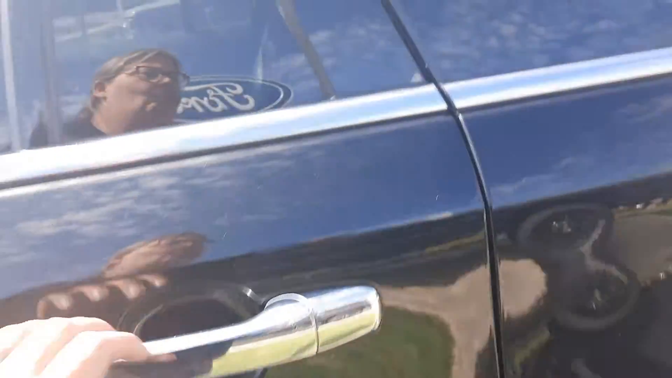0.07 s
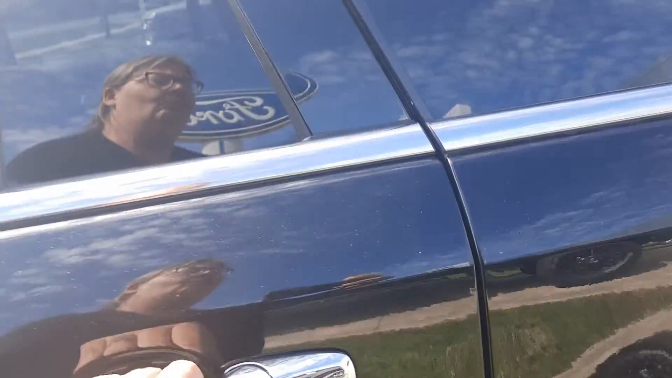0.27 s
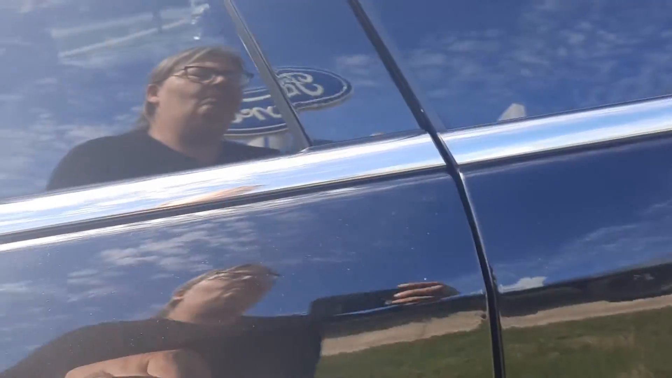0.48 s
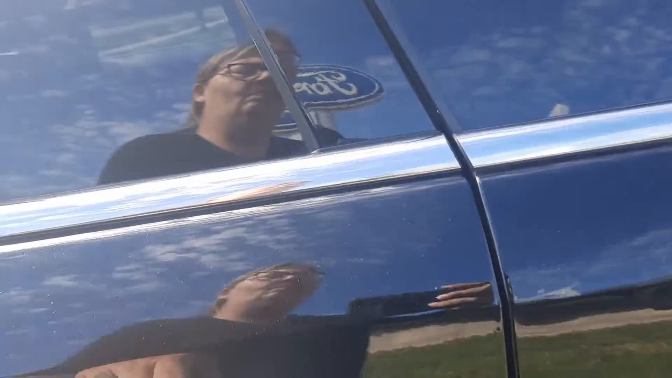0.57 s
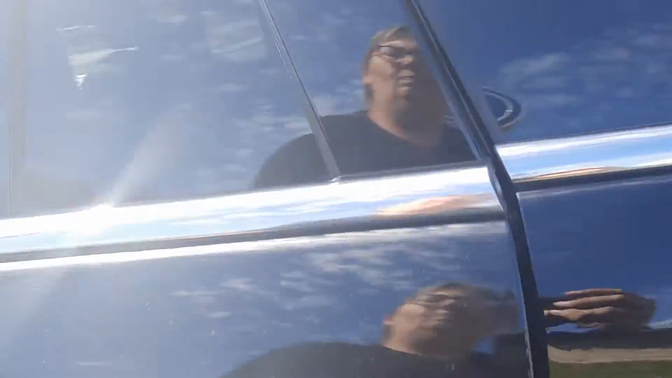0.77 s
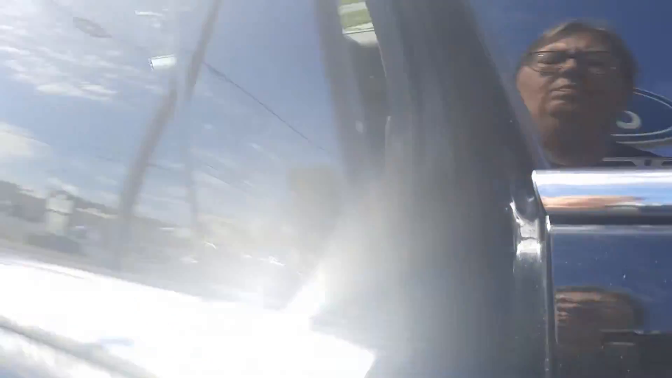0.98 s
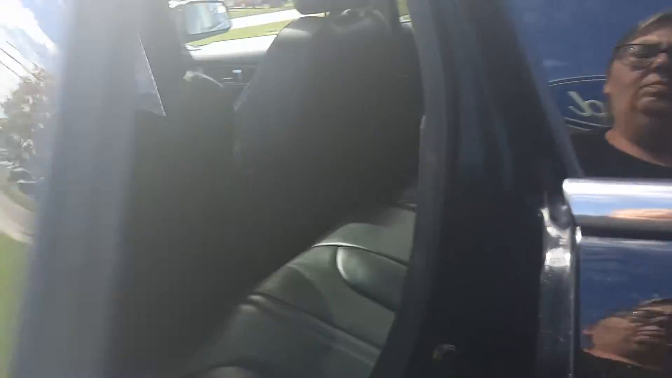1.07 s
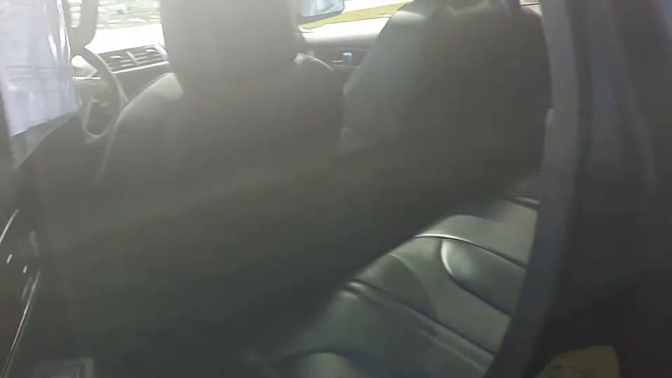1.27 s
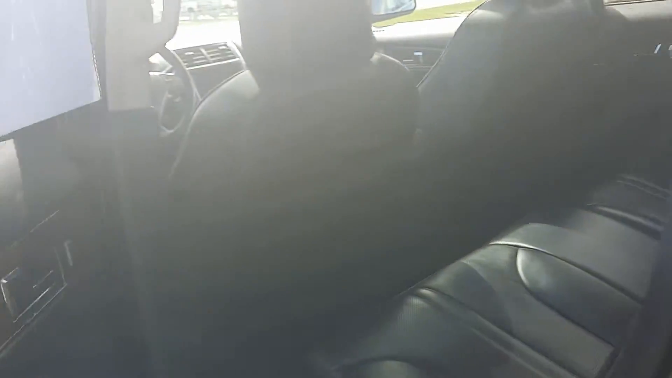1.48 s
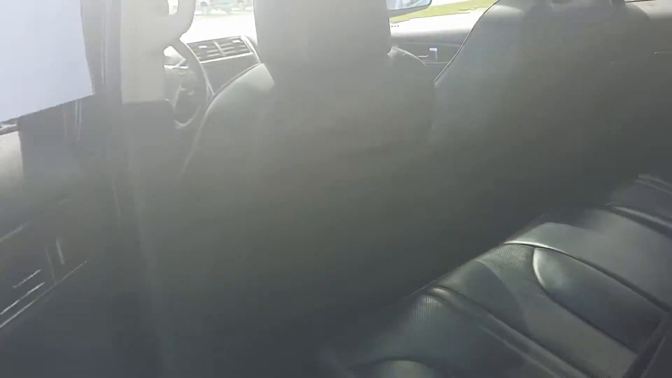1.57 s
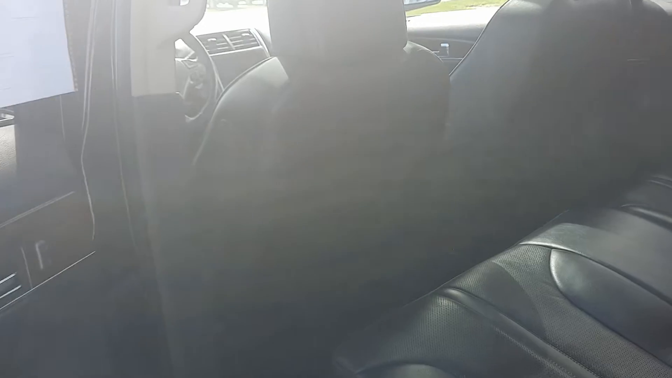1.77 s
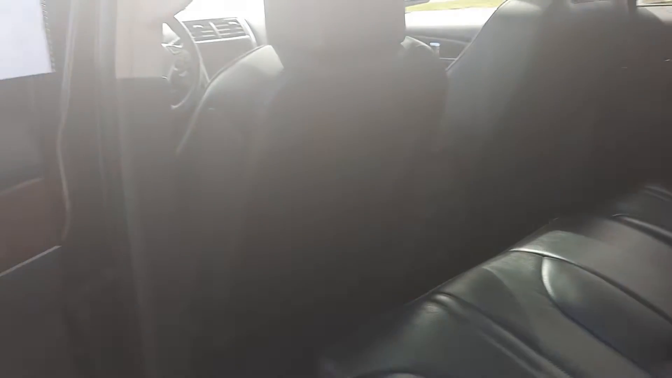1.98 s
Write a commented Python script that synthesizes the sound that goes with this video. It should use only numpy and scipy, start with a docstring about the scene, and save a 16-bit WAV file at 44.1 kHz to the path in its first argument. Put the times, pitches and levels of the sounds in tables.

```python
"""A car's rear door is opened outdoors, close by, over a low hum that swells and wavers.
The handle ticks and scrapes, the latch lets go with a clunk, and the door swings through moving air
until its check arm ticks and knocks into the stop. Blows are fading sine waves plus clattering noise;
ticks are bright noise snaps with small rings; scrapes and puffs are short swells of coloured noise.
The hum is three wavering low tones, and the background is coloured noise whose level changes."""
import sys
import numpy as np
from scipy import signal
from scipy.fft import rfft, irfft
from scipy.io import wavfile

SR = 44100
rng = np.random.default_rng(int(sys.argv[2]) if len(sys.argv) > 2 else 0)


def transcribe(u):
    """Save the signal u as a 16-bit wav file named by the first command-line argument.

    u: samples, shape (n,) or (channels, n), limited to [-1, 1]; the rate is SR.
    q: integer samples, one column per channel.
    """
    v = np.clip(np.atleast_2d(u).T, -1, 1)
    q = np.round(v * 32767).astype(np.int16)
    wavfile.write(sys.argv[1], SR, q)


N = 88200
TIME = np.arange(N) / SR
SHORT = SR // 2  # samples in one short sound: half a second


def amp(db):
    """Turns decibels into gain."""
    return 10 ** (np.asarray(db) / 20)


def unit(x):
    """Scales a sound to rms 1."""
    return x / np.sqrt(np.mean(x ** 2) + 1e-20)


def read(table, hz, axis=1):
    """Reads one column of a table between its rows, on a log-frequency axis."""
    rows = np.array(table, float)
    return np.interp(np.log(hz + 1), np.log(rows[:, 0] + 1), rows[:, axis])


def level(table, axis=1):
    """Turns a dB curve over time into gain."""
    rows = np.array(table, float)
    return amp(np.interp(TIME, rows[:, 0], rows[:, axis]))


def pan(db):
    """Gives left and right gains; positive dB makes the left louder."""
    return amp(np.array([[.5], [-.5]]) * db)


def add(mix, s, sound):
    """Mixes a sound in at time s, in seconds."""
    part = mix[:, round(s * SR):][:, :sound.shape[1]]
    part += sound[:, :part.shape[1]]


def noise(spectrum, pan_table, same_table, size):
    """Makes coloured stereo noise of rms 1; the two sides are partly alike, pitch by pitch."""
    hz = np.fft.rfftfreq(size, 1 / SR)
    shared, separate = rfft(rng.standard_normal((2, size)))
    same = np.clip(read(same_table, hz), -1, 1)
    right = same * shared + np.sqrt(1 - same ** 2) * separate
    stereo = np.array([shared, right]) * pan(read(pan_table, hz))
    return unit(irfft(stereo * amp(read(spectrum, hz)), size))


def ring(modes, rise_s):
    """Rings like a struck body: sine waves that start together and fade at their own speeds."""
    t = TIME[:SHORT]
    tones = sum(amp(db - 60 * t / t60) * np.sin(2 * np.pi * hz * t) for hz, db, t60 in modes)
    return tones * (1 - np.exp(-t / rise_s))


def struck(modes, hardness):
    """Tilts the modes about 500 Hz: a harder blow favours the higher ones, in dB per octave."""
    return [(hz, db + hardness * np.log2(hz / 500), t60) for hz, db, t60 in modes]


# How unevenly loose parts rattle at 1 kHz and above (dB), and the time between random strengths (s).
RATTLE_DB, RATTLE_S = 2, 0.0013


def clatter(table, pan_table, rise_s):
    """Blends many modes into noise; each band dies at its own speed and the treble rattles unevenly."""
    t = TIME[:SHORT]
    hz = np.fft.rfftfreq(SHORT, 1 / SR)
    spectrum = rfft(noise(table, pan_table, AIR_SAME, size=SHORT))
    contacts = np.interp(t / RATTLE_S, np.arange(SHORT), rng.standard_normal(SHORT))
    out = np.zeros((2, SHORT))
    for row in table:
        # this band fades over into its neighbours
        share = read([(other[0], other is row) for other in table], hz)
        rattle_db = RATTLE_DB * min(row[0] / 1000, 1) * contacts
        out += irfft(spectrum * share, SHORT) * amp(rattle_db - 60 * t / row[2])
    return out * (1 - np.exp(-t / rise_s))


def swells(rows, spectrum, pan_table, same_table):
    """Makes short arches of noise that rise and fall smoothly, each at its own level."""
    out = np.zeros((2, N))
    for s, length, db in rows:
        arch = np.sin(np.pi * np.arange(0, length, 1 / SR) / length)
        piece = noise(spectrum, pan_table, same_table, size=SHORT)[:, :len(arch)]
        add(out, s, amp(db) * arch * unit(piece))
    return out


# Blows of the latch: slack is taken up, the pawl slips, the door jumps off its seal and rebounds.
# Each row: start in seconds, panel ring in dB, clatter in dB, hardness in dB per octave.
LATCH = [(0.6748, -30, -38, -4.5), (0.7123, -13, -16.5, -0.5), (0.7179, -15, -20, 2.5),
         (0.7302, -26.5, -27, -5), (0.7615, -35, -48, -6)]
# Tones of the door panel. Each row: pitch in Hz, relative level in dB, time to fade by 60 dB in seconds.
DOOR_MODES = [(84, -18, 0.039), (147.5, 2, 0.05), (333.5, 0.5, 0.06), (390, -40, 0.073), (715, -7, 0.043),
              (868, -16.5, 0.048), (1086, -17.5, 0.03), (1160, -10.5, 0.042), (1430, -25.5, 0.082),
              (1580, -28, 0.14), (1786, -22, 0.11), (2290, -32, 0.071), (2424, -28.5, 0.12),
              (2860, -34, 0.06)]
# Clatter of the latch works.
# Each row: pitch in Hz, relative strength in dB per Hz, time to fade by 60 dB in seconds.
LATCH_CLATTER = [(59.4, 0.5, 0.7), (204, 10.5, 0.23), (403, 10, 0.16), (530, -9.5, 0.37), (766, 4.5, 0.11),
                 (1440, -6, 0.1), (2980, -11.5, 0.069), (4800, -20, 0.071), (8000, -24, 0.047),
                 (9700, -40, 0.039), (13000, -24, 0.033), (16000, -34, .04)]
# Tones of the latch's steel pawl.
# Each row: pitch in Hz, relative level in dB, time to fade by 60 dB in seconds.
PAWL_MODES = [(3650, -22, 0.045), (4540, 2, 0.022), (5210, 6.5, 0.015), (6000, -5, 0.019),
              (7710, -11, 0.022), (8700, -7, 0.02)]
# The linkage strains around the release. Each row: start in seconds, length in seconds, level in dB.
STRAINS = [(.655, 0.058, -27.5), (.735, 0.05, -28.5)]
# Colour of the straining. Each row: pitch in Hz, relative strength in dB per Hz.
STRAIN = [(60, -13), (170, 9.5), (350, 0), (750, -16), (1500, -22), (5000, -67), (16000, -69)]
# Extra strength of the first swing while the blow still presses (dB), and how fast it passes (s).
PUSH_DB, PUSH_S = 1, 0.0093


def latch():
    """The pawl snaps free; each blow rings the door panel and makes the latch works clatter."""
    out = swells(STRAINS, STRAIN, AIR_PAN, AIR_SAME)
    push = 1 + amp(PUSH_DB) * np.exp(-TIME[:SHORT] / PUSH_S)
    works_pan = [(300, 4.0), (1500, 2.0), (5000, -1), (8000, 0), (13000, 3)]  # Hz, left-right dB
    for s, ring_db, clatter_db, hardness in LATCH:
        works = clatter(LATCH_CLATTER, works_pan, rise_s=0.00064)
        panel = pan(4.0) * push * ring(struck(DOOR_MODES, hardness), rise_s=0.00069)
        add(out, s, amp(ring_db) * panel + amp(clatter_db) * works)
    pawl = amp(-28.5) * pan(-7.5) * ring(PAWL_MODES, rise_s=0.00051)
    add(out, .7136, pawl + amp(-26.0) * snap(tail_db=-15))
    return out


# Knocks into the door stop.
# Each row: start in seconds, door ring in dB, crunch in dB, hardness in dB per octave.
STOP = [(1.5979, -33.5, -24.5, 11.5), (1.6031, -20.5, -37, 0), (1.6091, -31.5, -27, -2),
        (1.6185, -29, -32.5, -5.5)]
# Tones of the open door. Each row: pitch in Hz, relative level in dB, time to fade by 60 dB in seconds.
STOP_MODES = [(125, -11, 0.78), (236.7, 2.5, 0.18), (338.5, 0, 0.14), (513, -5.5, 0.083), (568, 5.5, 0.056),
              (858, -6, 0.1), (970, -16, 0.054), (1310, -27, 0.055), (2270, -10.5, 0.015)]
# Crunch of the stop.
# Each row: pitch in Hz, relative strength in dB per Hz, time to fade by 60 dB in seconds.
STOP_CLATTER = [(40, -12, .2), (130, 6, 0.74), (520, 6, 0.23), (1030, -4.5, 0.16), (1770, -4, 0.11),
                (2440, -5, 0.069), (3930, -12, 0.054), (7900, -33, 0.078), (16000, -34, 0.052)]


def door_stop():
    """The check arm crunches into its notch in a few quick knocks that ring the open door."""
    out = np.zeros((2, N))
    crunch_pan = [(400, 7.5), (2000, 2), (6000, 0), (13000, 8)]  # Hz, left-right dB
    for s, ring_db, clatter_db, hardness in STOP:
        crunch = clatter(STOP_CLATTER, crunch_pan, rise_s=0.0003)
        door = pan(4.9) * ring(struck(STOP_MODES, hardness), rise_s=0.00048)
        add(out, s, amp(ring_db) * door + amp(clatter_db) * crunch)
    return out


# Colour of a snap. Each row: pitch in Hz, relative strength in dB per Hz.
TICK = [(400, 11.5), (1400, -3), (2600, -1), (3300, 3), (4100, -2), (5200, 0), (6200, 11.5), (7200, 1),
        (8500, 5.5), (10500, -3), (12300, 5), (16000, -10)]
# Where a snap sits. Each row: pitch in Hz, how much louder the left is in dB.
TICK_PAN = [(1000, 0.5), (3000, -2), (5500, -5), (8000, -3), (12000, 13.5)]
TICK_T60, TICK_TAIL_T60 = 0.0068, 0.073  # seconds for the crack and its tail to fade by 60 dB


def snap(tail_db):
    """Makes a bright crack of noise that dies at once, over a weaker tail that dies more slowly."""
    t = TIME[:SHORT]
    crack = amp(-60 * t / TICK_T60)
    tail = amp(tail_db - 60 * t / TICK_TAIL_T60)
    fade = (crack + tail) * (1 - np.exp(-t / 0.0005))
    return fade * noise(TICK, TICK_PAN, AIR_SAME, size=SHORT)


# Small ticks of the handle and check arm. Each row: start in seconds, snap level in dB,
# how much louder the left is in dB, level of the handle's ring in dB, tail of the snap in dB.
TICKS = [(0.2216, -21.5, 2.5, -28, -24), (1.4411, -30, -4.5, -51, -14.5), (1.557, -17.5, 0.5, -48, -17.5)]
# Small steel parts that ring in every tick.
# Each row: pitch in Hz, relative level in dB, time to fade by 60 dB in seconds.
TICK_MODES = [(3410, -8, 0.028), (4530, -9, 0.038), (5020, -7, 0.032), (6010, 2, 0.024), (8230, -3, 0.013),
              (12260, -8.5, 0.025)]
# Tones of the handle. Each row: pitch in Hz, relative level in dB, time to fade by 60 dB in seconds.
HANDLE_MODES = [(126, 10.5, 0.074), (292, 6, 0.023), (456, -2.5, 0.088), (707, -2, 0.05), (860, 1.5, 0.034),
                (1010, 4.5, 0.022), (1227, 9.5, 0.028), (1380, 1, 0.028), (1910, 0, .03),
                (3180, -8.5, 0.027)]


def ticks():
    """Small steel parts snap and ring, and they ring the handle a little."""
    out = np.zeros((2, N))
    parts = [pan(read(TICK_PAN, mode[0])) * ring([mode], rise_s=0.00029) for mode in TICK_MODES]
    steel = amp(-13.5) * sum(parts)
    for s, db, pan_db, ring_db, tail_db in TICKS:
        click = amp(db) * pan(pan_db) * (snap(tail_db) + steel)
        handle = amp(ring_db) * pan(3.7) * ring(HANDLE_MODES, rise_s=0.0009)
        add(out, s, click + handle)
    return out


# The handle and check arm slide. Each row: start in seconds, length in seconds, level in dB.
SCRAPES = [(.52, 0.063, -41), (.665, 0.02, -47), (.815, 0.032, -47.5), (1.587, 0.018, -30)]
# Colour of the sliding. Each row: pitch in Hz, relative strength in dB per Hz.
SCRAPE = [(300, 19.5), (1300, 11), (3000, -0.5), (6000, 2), (10000, -8.5), (14000, -4.5), (16000, -19)]
# The hinge rubs briefly. Each row: start in seconds, length in seconds, level in dB.
RUBS = [(1.365, 0.0076, -42.5)]
# Colour of the rub. Each row: pitch in Hz, relative strength in dB per Hz.
RUB = [(500, -17), (1300, 1.5), (2200, -1), (4000, -18), (16000, -17)]


def friction():
    """Swells of noise: scrapes of sliding parts and a short rub of the hinge."""
    scrapes = swells(SCRAPES, SCRAPE, TICK_PAN, AIR_SAME)
    rub = swells(RUBS, RUB, [(1000, 7)], AIR_SAME)
    return scrapes + rub


# Faint narrow band of noise near 6.7 kHz. Each row: start in seconds, length in seconds, level in dB.
NARROW_SWELLS = [(.98, 0.45, -57), (1.4, 0.26, -59.5)]
# Colour of the narrow band. Each row: pitch in Hz, relative strength in dB per Hz.
NARROW_BAND = [(3000, -22.5), (5900, -19), (6650, -12), (7200, -24), (10000, -29.5)]


def narrow_noise():
    """Swells of a faint narrow band of high noise."""
    return swells(NARROW_SWELLS, NARROW_BAND, TICK_PAN, AIR_SAME)


PORT_DELAY_S = 0.0002516  # close door sounds reach the left microphone first


def at_ports(x):
    """Delays the right channel by the extra path between the microphones."""
    lag = np.exp(-2j * np.pi * np.fft.rfftfreq(N, 1 / SR) * PORT_DELAY_S)
    return np.array([x[0], irfft(rfft(x[1]) * lag, N)])


# Dull bumps as the door swings. Each row: start in seconds, length in seconds, level in dB.
BUMPS = [(1.315, 0.035, -23.5), (1.386, 0.031, -22)]
# Colour of the bumps. Each row: pitch in Hz, relative strength in dB per Hz.
BUMP = [(60, -25), (170, 7.5), (300, 4.5), (500, -9), (800, -46), (2000, -67), (8000, -54)]


def bumps():
    """Dull swells of low noise, almost wholly on the left, as the door swings."""
    return swells(BUMPS, BUMP, [(100, 46)], [(100, 0.2)])


# Puffs of air on the microphone. Each row: start in seconds, length in seconds, level in dB.
PUFFS = [(1.28, 0.049, -23), (1.32, 0.073, -24), (1.47, 0.094, -29.5), (1.574, 0.028, -19.5),
         (1.605, 0.1, -27), (1.7, .14, -28)]
# Colour of the puffs. Each row: pitch in Hz, relative strength in dB per Hz.
PUFF = [(25, -27), (55, 4), (85, 4), (160, -6.5), (320, -14.5), (550, -35.5), (1200, -77), (4000, -63)]


def puffs():
    """Moving air presses on the microphone in swells of low noise, little alike on the two sides."""
    return swells(PUFFS, PUFF, [(100, 8.7)], [(100, 0.13)])


# Sudden buffets of air, mostly on the left microphone.
# Each row: middle in seconds, peak in dB before panning, pitch in Hz.
BUFFETS = [(1.203, -23, 115), (1.291, -22.5, 80), (1.311, -23.5, 77), (1.338, -22, 151), (1.352, -23, 105),
           (1.373, -22.5, 113), (1.402, -29, 298), (1.409, -16.5, 85)]


def buffets():
    """Each eddy is one smooth push and pull of pressure."""
    out = np.zeros(N)
    for s, db, hz in BUFFETS:
        u = 2 * np.pi * hz * (TIME - s)
        out -= amp(db) * u * np.exp((1 - u ** 2) / 2)
    return out * pan(17.8)


# Tones of the hum.
# Each row: pitch in Hz, relative level in dB, waver from 0 to 1, how much louder the left is in dB.
HUM = [(76.9, -42.5, 0.58, 1), (198.74, -42.5, 0.13, 5), (294, -55.5, 0.22, -3.5)]
# Level of the hum over time, added to the levels above.
# Each row: time in seconds, lowest tone in dB, upper tones in dB.
HUM_LEVEL = [(0, -22, 4), (.42, 9, 6.5), (.9, 4, 4), (1.4, 5.5, -0.5), (2, -0.5, -0.5)]


def hum():
    """Three low tones swell by a table and waver at random in strength and phase."""
    out = np.zeros((2, N))
    knots = np.linspace(0, N / SR, num=24)
    for k, (hz, db, waver, pan_db) in enumerate(HUM):
        a, b = (np.interp(TIME, knots, v) for v in rng.standard_normal((2, len(knots))))
        carrier = np.exp(2j * np.pi * (hz * TIME + rng.random()))
        line = ((1 + waver * (a + 1j * b)) * carrier).real
        out += amp(db) * pan(pan_db) * unit(line) * level(HUM_LEVEL, axis=2 if k else 1)
    return out


# Colour of the outdoor air. Each row: pitch in Hz, relative strength in dB per Hz.
AIR = [(15, -57), (30, -1), (48, -14.5), (75, 1), (102, -8), (140, -5), (195, -9), (229, -23.5), (301, -10),
       (350, -16.5), (463, -21.5), (560, -24.5), (800, -27.5), (1200, -31.5), (2100, -34), (2700, -37.5),
       (4000, -45.5), (5500, -47.5), (9000, -53), (13200, -63.5), (16000, -74)]
# Where the air sits. Each row: pitch in Hz, how much louder the left is in dB.
AIR_PAN = [(80, 2), (250, 3.5), (600, 5), (1500, .5), (3000, 0), (5000, -4.5), (9000, 1.5), (14000, 35.5)]
# How alike left and right are. Each row: pitch in Hz, likeness (1 is identical, 0 is unrelated).
AIR_SAME = [(60, 0.88), (300, 0.89), (1000, 0.06), (3000, 0.042), (12000, 0.067)]
# Level of the air over time. Each row: time in seconds, level in dB.
AIR_LEVEL = [(0, -32.5), (.55, -32), (.9, -34.5), (1.4, -35), (1.7, -37), (2, -35.5)]
# Colour of the high hiss. Each row: pitch in Hz, relative strength in dB per Hz.
HISS = [(2000, -30), (6500, -8), (9500, -9.5), (11700, -4.5), (13200, 3), (14500, -1), (16000, -8.5)]
# Level of the hiss over time. Each row: time in seconds, left in dB, right in dB.
HISS_LEVEL = [(0, -58.5, -61.5), (.45, -57, -63), (.8, -86, -70), (1.03, -77, -67), (1.2, -59, -62),
              (1.55, -62, -63.5), (1.7, -61.5, -67), (1.8, -57, -56.5), (2, -52.5, -51)]


def background():
    """Outdoor rumble and a high hiss are both coloured noise whose level changes."""
    hiss_level = np.array([level(HISS_LEVEL), level(HISS_LEVEL, axis=2)])
    hiss = noise(HISS, [(1000, 0)], AIR_SAME, size=N) * hiss_level
    air = noise(AIR, AIR_PAN, AIR_SAME, size=N) * level(AIR_LEVEL)
    return air + hiss


def scene():
    """Close door sounds and a faint narrow noise over moving air, hum and background."""
    close = at_ports(latch() + door_stop() + ticks() + friction() + narrow_noise())
    moving_air = bumps() + puffs() + buffets()
    return close + moving_air + hum() + background()


LOW_CUT_HZ, EDGE_HZ = 40.4, 16000  # lowest and highest pitches let through


def record(dry):
    """Cuts the lowest rumble, clips at full scale, then removes the treble above the band edge."""
    high_pass = signal.butter(2, LOW_CUT_HZ, "high", fs=SR, output="sos")
    cut = signal.sosfiltfilt(high_pass, dry, padtype="even")
    low_pass = signal.firwin(401, EDGE_HZ, window=("kaiser", 9), fs=SR)
    return signal.oaconvolve(np.clip(cut, -1, 1), low_pass[None], "same")


dry = scene()
out = record(dry)
transcribe(out)
```